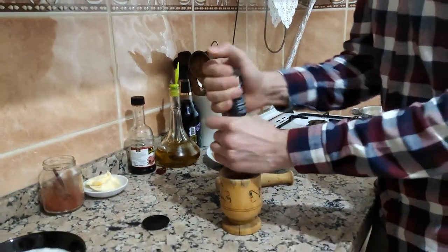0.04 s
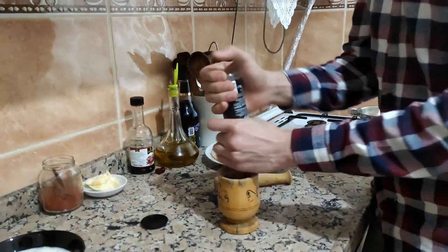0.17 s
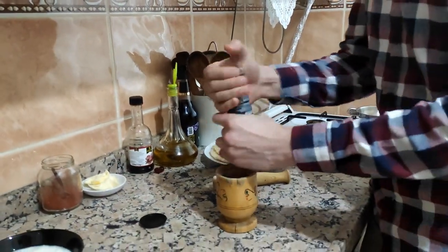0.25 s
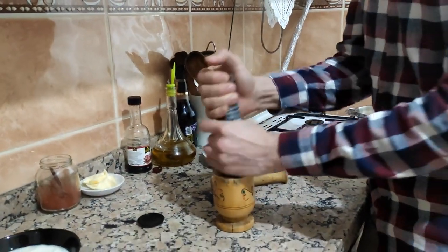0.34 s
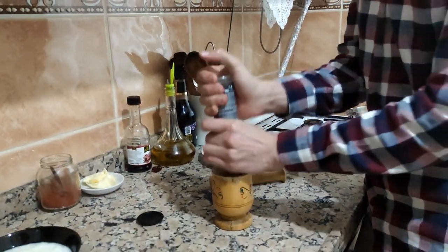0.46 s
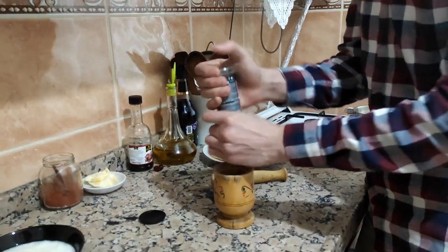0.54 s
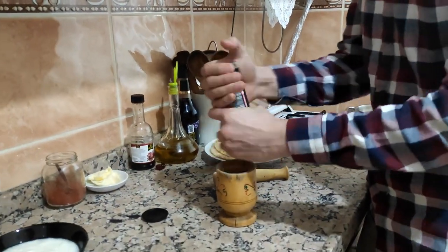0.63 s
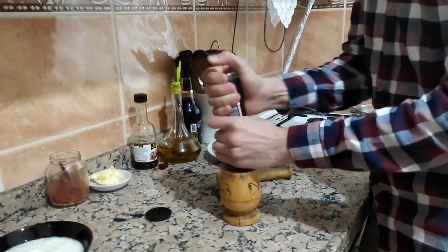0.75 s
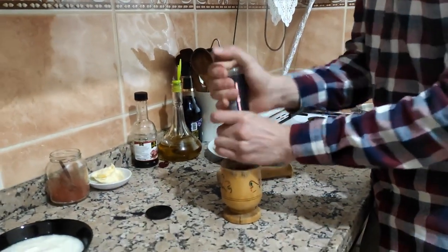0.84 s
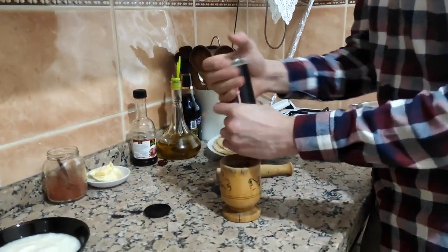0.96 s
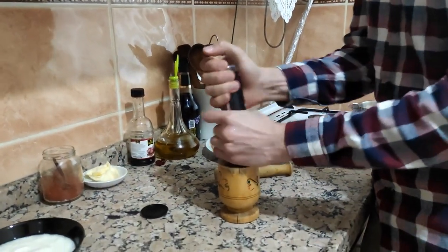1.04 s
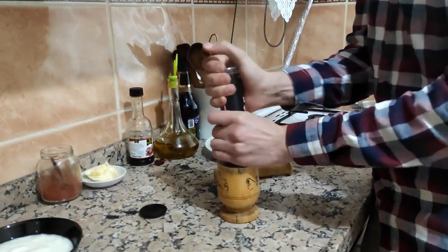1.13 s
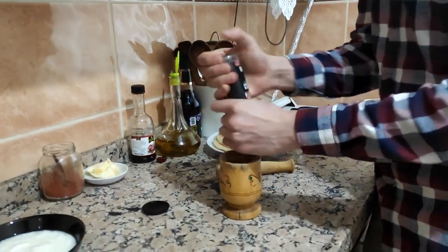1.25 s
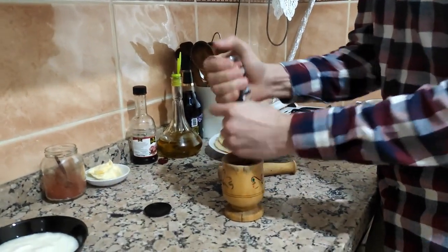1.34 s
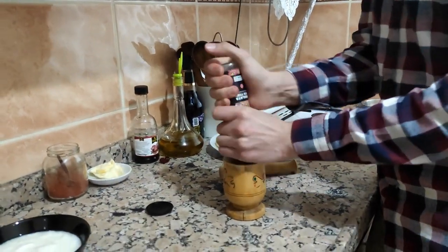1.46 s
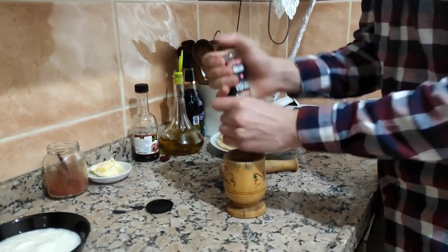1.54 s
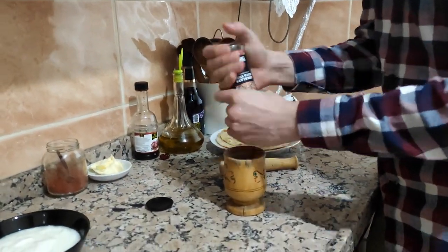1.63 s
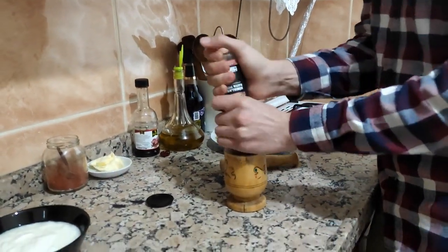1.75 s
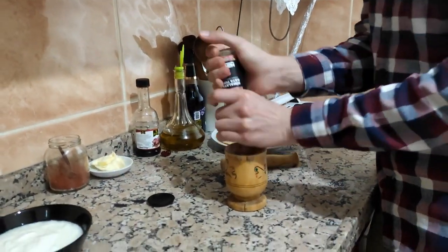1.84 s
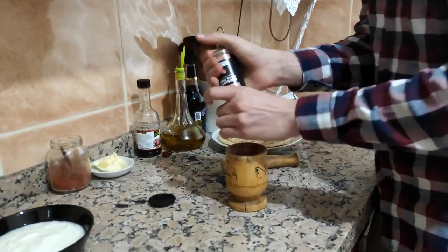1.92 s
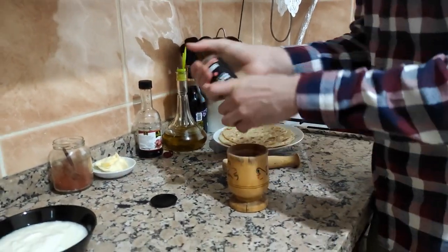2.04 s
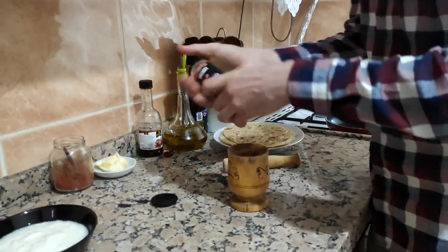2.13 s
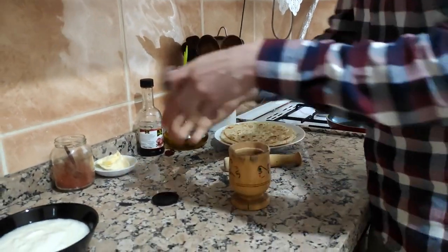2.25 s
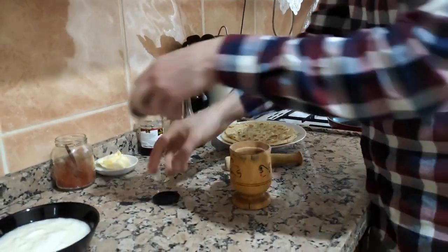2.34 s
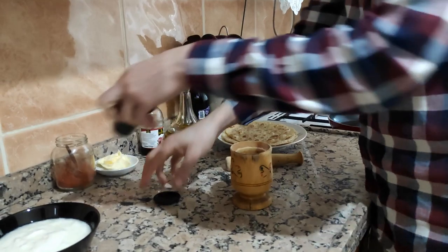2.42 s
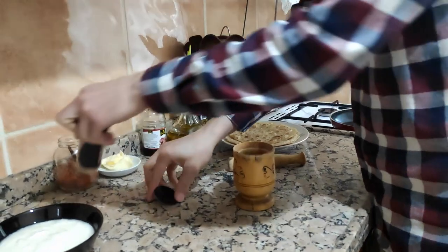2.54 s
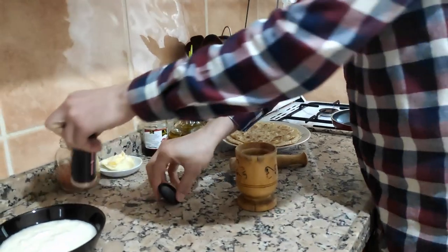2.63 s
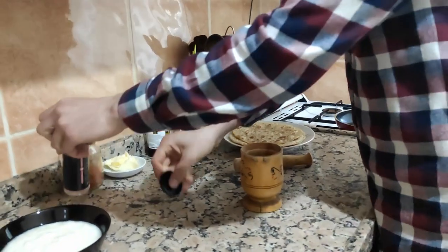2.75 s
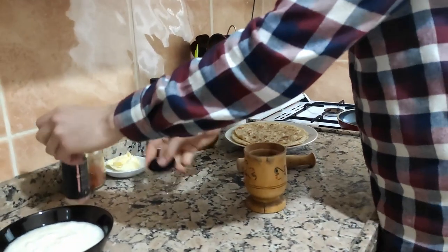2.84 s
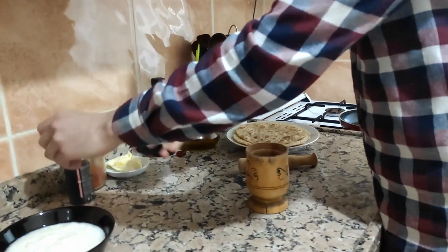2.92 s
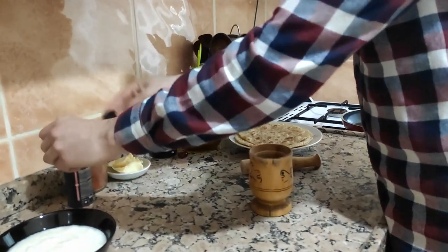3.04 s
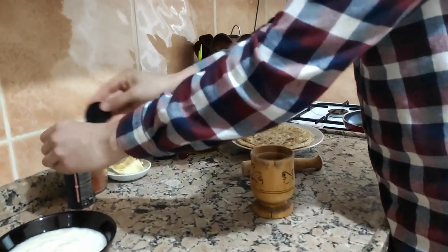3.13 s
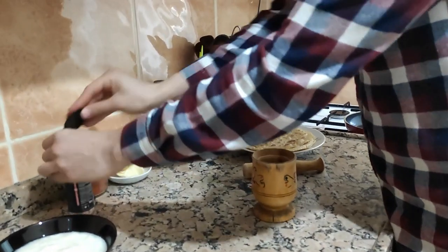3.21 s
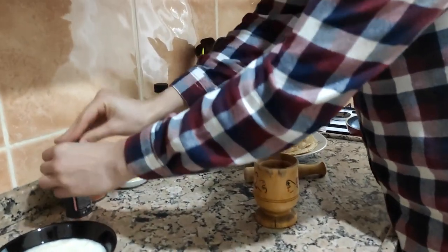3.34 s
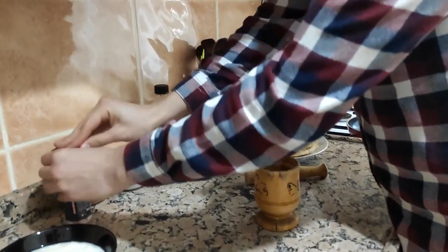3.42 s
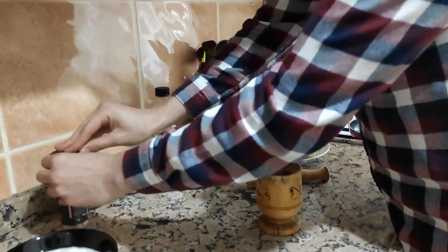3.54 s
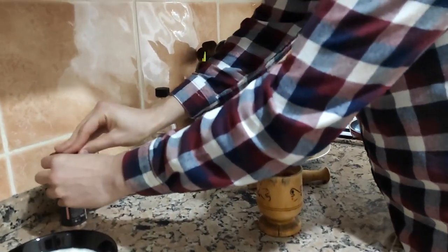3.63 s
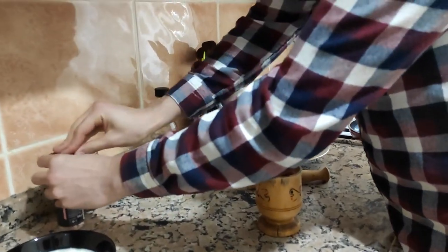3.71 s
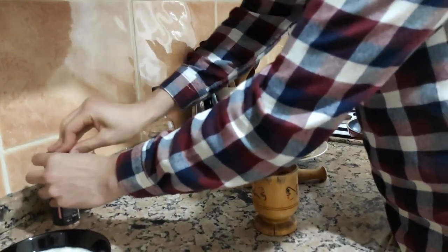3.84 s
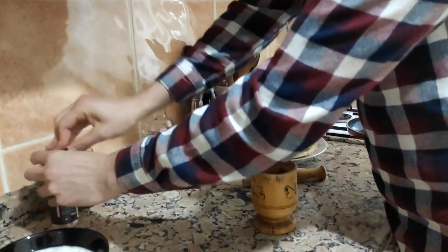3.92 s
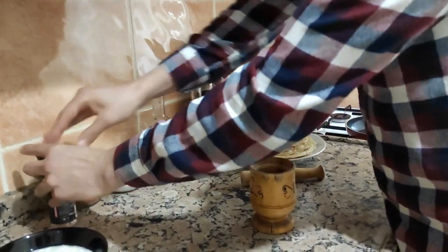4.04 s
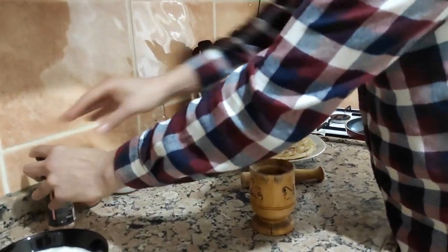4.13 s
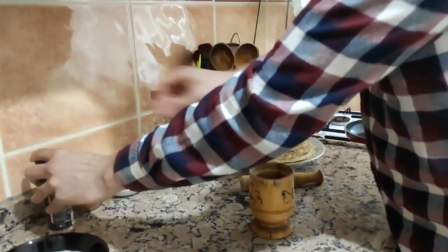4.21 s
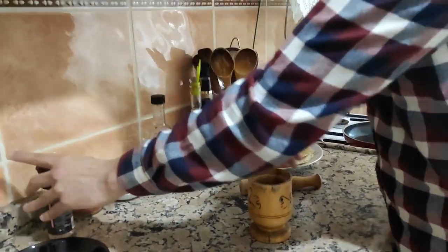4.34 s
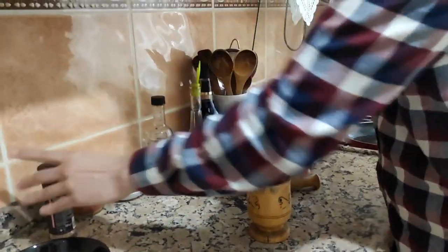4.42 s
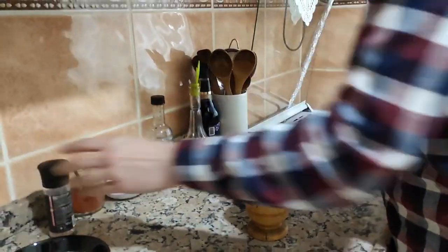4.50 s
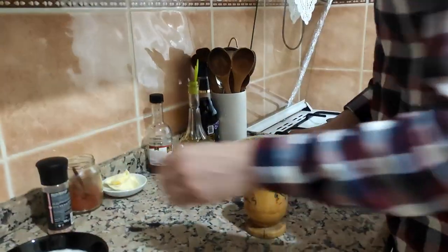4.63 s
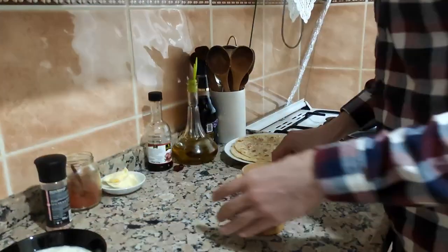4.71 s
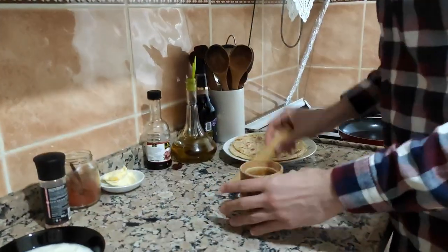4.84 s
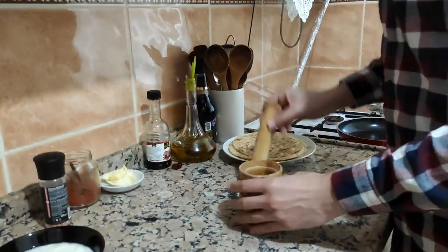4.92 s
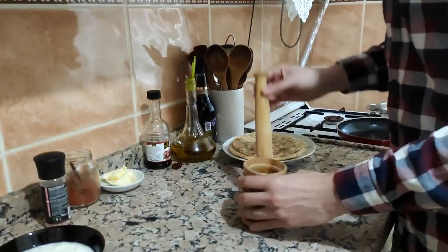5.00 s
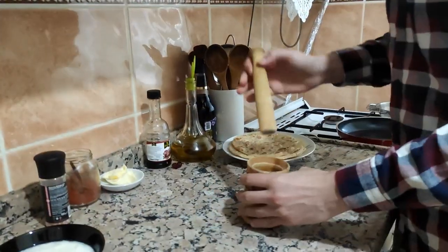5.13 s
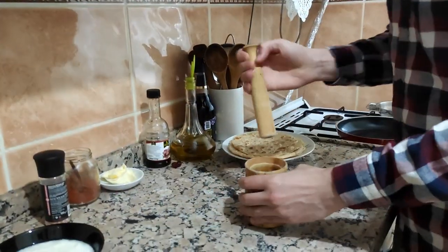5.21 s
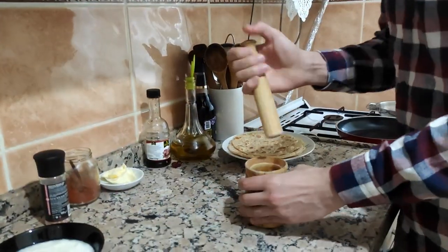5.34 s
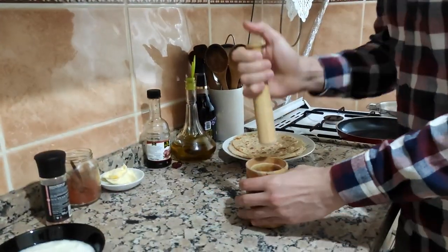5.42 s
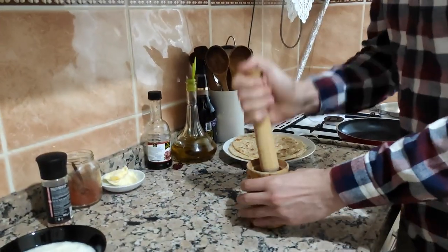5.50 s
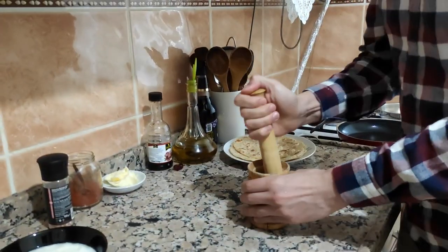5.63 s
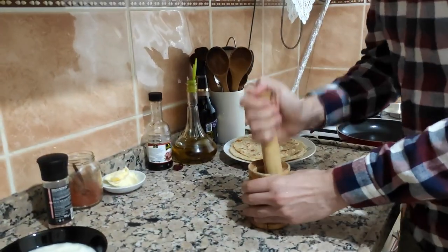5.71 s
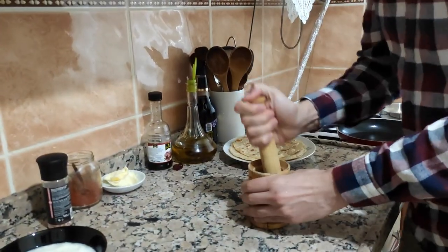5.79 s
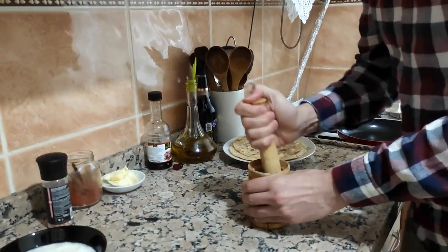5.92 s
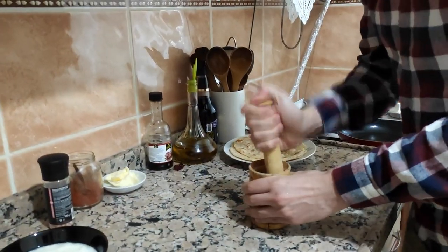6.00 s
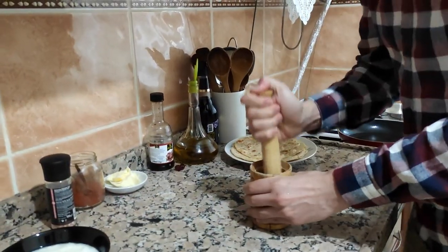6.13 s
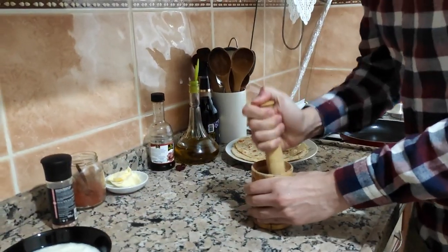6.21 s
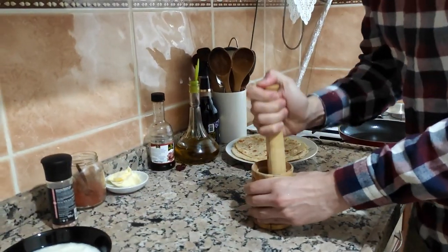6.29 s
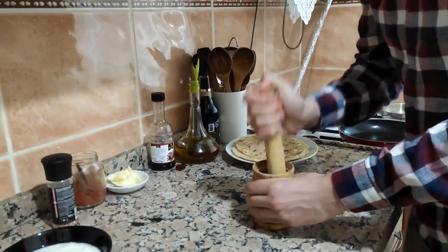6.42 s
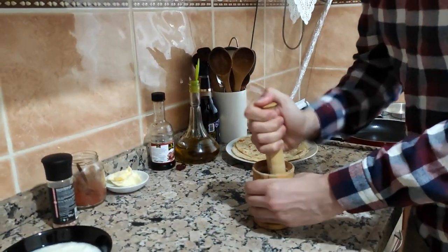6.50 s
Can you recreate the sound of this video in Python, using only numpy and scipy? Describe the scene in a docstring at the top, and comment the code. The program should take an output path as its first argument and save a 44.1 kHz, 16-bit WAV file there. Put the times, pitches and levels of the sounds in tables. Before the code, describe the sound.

A faint, low fridge hum runs throughout in a tiled kitchen with a short echo. From the start to about 2 seconds, a hand mill grinds salt in six short twists, roughly three a second, each a dry crunch with sharp snaps and a soft hiss of loose grains. A thin, high ping comes at 2 seconds, and salt slides softly until nearly 3. Just after 3 seconds the mill knocks down on a stone counter, followed by light clicks and taps of its cap until about 4.2. At around 5.3 seconds a wooden mortar knocks on the stone. Light wooden taps come near 5.7, then from 6 to about 6.5 seconds a wooden pestle pounds garlic in a fast run of louder blows, each ringing the bowl briefly, the heavier ones with a dull thud from the counter.

```python
"""A fridge hums in a tiled kitchen. Six twists of a hand mill grind salt into a wooden mortar: loose grains
hiss as the hand regrips, then crystals crunch and snap between the burrs. The mill is lifted away with a
thin ping and a slide of salt, knocks down on the stone counter at 3 s and is capped. From 5 s the mortar
is shifted and knocks on the stone; last, the pestle pounds garlic in a fast run of blows that ring the
bowl and make the counter thud."""
import sys
import numpy as np
from scipy import signal
from scipy.fft import rfft, irfft
from scipy.io import wavfile
from scipy.ndimage import uniform_filter1d

SR = 44100
rng = np.random.default_rng(int(sys.argv[2]) if len(sys.argv) > 2 else 0)


def store_pcm(level_fs):
    """Save levels as 16-bit WAV."""
    pcm = np.round(np.clip(level_fs, -1, 1) * 32767).astype(np.int16)
    wavfile.write(sys.argv[1], SR, np.atleast_2d(pcm).T)


N = 289296
SIZE = 24576  # samples in one hit and its tail
T, HZ = np.arange(SIZE) / SR, np.fft.rfftfreq(SIZE, 1 / SR)

# Decay of the tiled room: frequency_hz, t60_s
ROOM_DECAY = [(120, 0.18), (400, 0.6), (1000, 0.33), (2700, 0.29), (7000, 0.27), (14000, 0.22)]
# How alike left and right are in the room: frequency_hz, correlation
STEREO_LIKENESS = [(30, 0.35), (100, 0.18), (250, 0.81), (600, 0.46), (1300, 0.033), (14000, .1)]
# Tone of the still air: frequency_hz, gain_db
AIR_EQ = [(10, -4), (28, -16), (50, -20), (80, -13), (160, -13.5), (190, -20.5), (298, -17), (430, -24),
          (900, -31.5), (2500, -38.5), (6000, -40.5), (7800, -38), (9000, -51.5), (14500, -47.5)]
# Partials of the fridge hum: pitch_hz, relative_level_db
FRIDGE_PARTIALS = [(100, -53), (149.7, -57.5), (205, -71), (250, -70), (300, -72.5)]
# Salt sliding as the mill is carried off and the mortar is jolted: middle_s, length_s, level_db
SALT_SLIDES = [(2.235, 0.2, -52), (2.525, 0.32, -52), (2.686, 0.23, -44), (2.905, 0.062, -58),
               (5.841, 0.1, -50)]
# Tone of sliding salt: frequency_hz, gain_db
SLIDE_EQ = [(500, -31), (2000, -10), (4800, -11), (6400, 5.5), (7800, -1), (9000, -14.5), (11000, -19),
            (13500, -9.5)]
# Twists of the mill: start_s, end_s, level_db, swell_db, regrip_hiss_db
MILL_TWISTS = [(0.114, 0.179, -41, 3, -55), (0.467, 0.534, -39, 7, -60), (0.808, 0.876, -41.5, 20, -51.5),
               (1.143, 1.228, -44, -11, -48.5), (1.471, 1.535, -42.5, 6, -50), (1.778, 1.9, -43.5, -8, -52)]
# What the grinding rings in the mill and the hollow below it: pitch_hz, level_db, t60_s
GRIND_MODES = [(974, -13, 0.1), (1610, -8, 0.068), (2790, -10, .08), (3410, 20, 0.019)]
# Tone of salt being crushed: frequency_hz, gain_db
GRIND_EQ = [(300, -23), (600, -9.5), (820, -10.5), (1000, 8), (1250, -6.5), (1650, 0), (2300, 2),
            (3300, -1.5), (4800, -2), (7700, -1.5), (9000, -20.5), (11000, -16.5), (13400, -24),
            (14500, -11)]
# Large crystals snapping and small ticks of the mill: start_s, level_db, pitch_hz
SNAP_HITS = [(.491, -1.5, 3020), (0.552, -1, 2870), (.87, -5, 3730), (1.189, -4.5, 3320),
             (1.444, -13.5, 2240), (1.534, 2.5, 3500), (1.902, -4.5, 2780), (2.164, -18.5, 1810),
             (3.928, -15, 6600)]
# Knocks of the mill and its cap: start_s, level_db, treble_db, bass_db, pitch_hz
MILL_KNOCKS = [(3.0531, -8, -2, -4.5, 2380), (3.149, -23.5, -9, -3, 1210), (3.380, -36.5, 13, -14, 3050),
               (3.393, -27, -2.5, -16, 3080), (3.485, -30.5, 19, 5, 3250), (3.584, -21, -5, -5, 1560),
               (3.712, -33.5, 14, 11.5, 1130), (3.72, -26.5, -5, 7, 1860), (4.221, -26, -7, -6.5, 770)]
# Tone of a knock's crack on the mill: frequency_hz, gain_db
MILL_EQ = [(50, -24.5), (100, 4), (200, -2), (400, -2), (550, -3.5), (850, -1), (1200, -4), (1600, -3),
           (2400, -6), (4000, -14), (5500, -20), (7800, -21.5), (9000, -39.5), (14000, -38.5)]
# Modes of the mill standing on the stone, and of its cap: pitch_hz, level_db, t60_s
MILL_MODES = [(404, -4, 0.29), (762, -1, 0.094), (1070, -5, 0.29), (1140, 1, 0.12), (1606, -5, 0.16),
              (2270, -3.5, 0.16), (2390, -7.5, .2), (3030, -6, .1), (3420, -12, .13), (4164, -13.5, .1)]
# Knocks and pestle blows on the mortar: start_s, level_db, rim_ring_db, counter_thud_db, spot_pitch_hz
MORTAR_BLOWS = [(5.042, -52.5, -5, -49.5, 860), (5.296, -45, -6, -60, 850), (5.3196, -18.5, -4.5, -40, 804),
                (5.7085, -30, 12.5, -66, 1480), (5.835, -47.5, 12.5, -23, 910), (5.973, -18, 5, -23, 1130),
                (6.098, -25, 7, -43, 1550), (6.1205, -16, 1.5, -15.5, 1940),
                (6.286, -15, -0.5, -15.5, 2400), (6.335, -23, 14, -40, 1030),
                (6.4435, -24, -5, -15.5, 1090)]
# Tone of a crack on wood: frequency_hz, gain_db
WOOD_EQ = [(60, -17), (150, -1.5), (400, -1.5), (620, -0.5), (850, 0.5), (1250, 0.5), (2000, -4),
           (3000, -12.5), (3650, -11), (6000, -15.5), (7800, -14.5), (9000, -31), (14000, -36)]
# Modes of the wooden mortar: pitch_hz, level_db, t60_s
MORTAR_MODES = [(492, -3.5, 0.15), (753, -1.5, 0.2), (817, -3.5, 0.14), (1033, -6.5, 0.3),
                (1103, -4.5, 0.35), (1143, -2, 0.096), (1297, -9.5, 0.2), (1652, -4.5, 0.11),
                (2266, -18, 0.31), (2400, -20, 0.26), (2687, -12.5, 0.13), (3510, -7, 0.082),
                (3600, -18.5, 0.15), (4000, -10, 0.048)]
# Modes of the counter under the mortar: pitch_hz, level_db, t60_s
COUNTER_MODES = [(85.5, -11.5, 0.06), (156, -14, 0.073), (206, -1.5, 0.12), (270.2, -16.5, 0.35),
                 (293.5, -15, 0.28), (368.7, -23, 0.28), (442.5, -18, 0.2)]

CRACK_DB = 29.5  # drive of the contact noise into wood and mill


def amp(db):
    """Decibels to gain."""
    return 10 ** (np.asarray(db) / 20)


def pan(left_db):
    """Turns the left side up and the right side down by the same amount."""
    return amp([[left_db], [-left_db]])


def unit(x):
    """Scales to rms 1."""
    return x / np.sqrt(np.mean(x ** 2) + 1e-20)


def curve(points, hz):
    """Reads a table along a log-frequency axis."""
    f, value = np.transpose(points)
    return np.interp(np.log(hz + 1), np.log(f + 1), value)


def shelf(corner_hz):
    """High-shelf shape: a smooth step from 0 to 1 across the corner."""
    return HZ ** 3 / (HZ ** 3 + corner_hz ** 3)


def bell(hz, db):
    """A resonant EQ hump in dB around one pitch."""
    return db / (1 + (3.73 * np.log((HZ + 1) / hz)) ** 2)


def eq(x, gain_db):
    """Minimum-phase EQ, so attacks stay sharp; the gain is given on HZ."""
    cepstrum = irfft(np.log(amp(gain_db)))
    cepstrum[1:SIZE // 2] *= 2
    cepstrum[SIZE // 2 + 1:] = 0
    impulse = irfft(np.exp(rfft(cepstrum)))[None, :SIZE // 8]
    return signal.fftconvolve(x, impulse, axes=1)[:, :x.shape[1]]


def add(mix, start_s, sound):
    """Lays a stereo sound into the mix."""
    part = mix[:, max(round(start_s * SR), 0):][:, :sound.shape[1]]
    part += sound[:, :part.shape[1]]


def diffuse(size):
    """Stereo white noise, partly alike in the lows and wide in the highs."""
    left, other = rfft(rng.standard_normal((2, size)))
    likeness = np.clip(curve(STEREO_LIKENESS, np.fft.rfftfreq(size, 1 / SR)), -1, 1)
    right = likeness * left + np.sqrt(1 - likeness ** 2) * other
    return irfft(np.array([left, right]), size)


def room_tail():
    """Kitchen reverb of energy 1; each band dies at its own speed."""
    hz, t, bands = signal.stft(diffuse(SIZE), SR, nperseg=256)
    decay = amp(-60 * t / curve(ROOM_DECAY, hz)[:, None])
    tail = signal.istft(bands * decay, SR, nperseg=256)[1][:, :SIZE]
    return unit(tail * (1 - np.exp(-T / 0.0087))) / np.sqrt(SIZE)


def contact(clatter_s, room_db, direct_db):
    """A sharp crack, a clatter of echoes off counter and tiles, then the room; evened out to white."""
    crack = unit(rng.standard_normal(SIZE) * np.exp(-T / 0.0018))
    direct = np.array([np.pad(crack, (10, 0))[:SIZE], crack])  # reaches the right side first
    echoes = unit(diffuse(SIZE) * np.exp(-T / max(2 * clatter_s, .002)) * (1 - np.exp(-T / 0.0022)))
    burst = (amp(direct_db) * direct + echoes) / np.sqrt(SIZE) + amp(room_db) * room_tail()
    power = uniform_filter1d((abs(rfft(burst)) ** 2).mean(0), size=201)
    return eq(burst, -10 * np.log10(power / power.mean()))


def ring(modes, rise_s, vary_db):
    """Dying modes whose strength changes with the spot that is hit."""
    out = np.zeros((2, SIZE))
    for hz, db, t60_s in modes:
        # short waves reach left and right out of step
        phase = rng.uniform(0, 2 * np.pi) + hz / 900 * rng.standard_normal((2, 1))
        envelope = amp(db + vary_db * rng.standard_normal() - 60 * T / t60_s)
        out += envelope * np.sin(2 * np.pi * hz * T + phase)
    return out * (1 - np.exp(-T / rise_s))


def room_air():
    """A faint bed of still air, its level set by the part above the rumble."""
    air = eq(diffuse(N), curve(AIR_EQ, HZ))
    above_rumble = signal.sosfilt(signal.butter(4, 350, "high", fs=SR, output="sos"), air)
    return amp(-63.5) * air / above_rumble.std() * pan(.7)


def fridge():
    """A low hum a little to the left; each partial wavers in level and phase."""
    t, knots = np.arange(N) / SR, np.linspace(0, N / SR, 30)
    hum = np.zeros(N)
    for hz, db in FRIDGE_PARTIALS:
        sway, drift = (np.interp(t, knots, v) for v in rng.standard_normal((2, len(knots))))
        hum += amp(db + 1.4 * sway) * np.sqrt(2) * np.sin(2 * np.pi * hz * t + .2 * drift)
    return amp(-3.0) * hum * pan(.7)


def sliding_salt():
    """Tiny grains run over each other in soft, ragged swells of hiss whenever the salt is moved."""
    lead_s, regrip_s = 0.057, .16  # the hand swings back before each twist and shakes the salt
    regrips = [(start_s - lead_s, regrip_s, db) for start_s, *_, db in MILL_TWISTS]
    hiss = np.zeros((2, N))
    for middle_s, length_s, db in regrips + SALT_SLIDES:
        size = max(round(length_s * SR), 64)
        add(hiss, middle_s - length_s / 2, amp(db) * np.hanning(size) * rng.standard_normal((2, size)))
    clumps = amp(2.2 * unit(uniform_filter1d(rng.standard_normal(N), size=500)))
    return eq(hiss * clumps, curve(SLIDE_EQ, HZ)) * pan(1)


def mill_grind():
    """Each twist crushes a dense shower of crystals, large and small, between the burrs."""
    grains_per_s, spread_db = 1400, 4
    out = np.zeros((2, N))
    for start_s, end_s, db, swell_db, _ in MILL_TWISTS:
        ramp = np.linspace(-.5, .5, max(round((end_s - start_s) * SR), 2))
        breaks = rng.random(SIZE) < grains_per_s / SR
        strength = amp(spread_db * np.minimum(rng.exponential(1, SIZE), 4.2))
        grains = (breaks * strength * rng.choice([-1, 1], SIZE))[:len(ramp)]
        shower = unit(grains) * amp(db + swell_db * ramp) * signal.windows.tukey(len(ramp), .15)
        crack = contact(0.0032, room_db=0.95, direct_db=0.5)
        body = amp(-39.5) * ring(GRIND_MODES, rise_s=0.00044, vary_db=0.92)
        add(out, start_s, signal.fftconvolve(shower[None], crack + body, axes=1))
    return eq(out, curve(GRIND_EQ, HZ)) * pan(.7)


def tick(db, hz, q):
    """A short click centred on one pitch; a high q draws it out into a ping."""
    resonance_db = -10 * np.log10(1 + (q * ((HZ + 1) / hz - hz / (HZ + 1))) ** 2)
    return eq(contact(0.00096, room_db=-5.5, direct_db=0.25), db + resonance_db - 12 * shelf(4450))


def snaps():
    """Large crystals snap and the mill ticks, standing out of the grinding and handling."""
    out = np.zeros((2, N))
    for start_s, db, hz in SNAP_HITS:
        add(out, start_s, tick(db, hz, q=1.8))
    add(out, 2.026, tick(db=4.5, hz=7260, q=44))  # one thin ping as the mill is lifted away
    return out


def mill_knocks():
    """The mill meets the stone and its cap is pressed home; harder contacts are brighter and shorter."""
    out = np.zeros((2, N))
    for start_s, db, treble_db, bass_db, hz in MILL_KNOCKS:
        clatter_s = 0.0058 * 2 ** (-treble_db / 17.5)
        tone_db = treble_db * shelf(2800) + bass_db * (1 - shelf(490)) + bell(hz, db=7)
        crack = eq(contact(clatter_s, room_db=-4.5, direct_db=-6.5), curve(MILL_EQ, HZ) + CRACK_DB)
        body = amp(-15.5) * ring(MILL_MODES, rise_s=0.0013, vary_db=2)
        add(out, start_s, amp(db) * eq(crack + body, tone_db))
    return out


def counter_thud(db):
    """The heavy counter takes a moment to swing: low modes over a dull, pitchless push."""
    push = eq(contact(0.016, room_db=-0.5, direct_db=-1.2), 7 + 20 * shelf(40) - 50 * shelf(760))
    return amp(db) * (ring(COUNTER_MODES, rise_s=0.0052, vary_db=1.0) + push) * pan(-1.2)


def mortar_and_pestle():
    """Wood cracks and rings the bowl; a blow that lands on the bottom also drives the counter."""
    rim_hz, full_blow_db = 3770, -18
    wall_echo_s, wall_echo_db = .0195, -2
    out = np.zeros((2, N))
    for start_s, db, rim_db, thud_db, spot_hz in MORTAR_BLOWS:
        # a blow that glances off the rim is shorter and crushes less salt
        clatter_s = 0.0042 * 2 ** (-rim_db / 17)
        crunch_db = -0.74 * rim_db
        # a full blow rings the whole bowl; the lighter the touch, the more one pitch stands out
        spot_db = 3 + 0.35 * (full_blow_db - db)
        tone_db = crunch_db * shelf(5900) + bell(rim_hz, rim_db) + bell(spot_hz, spot_db)
        crack = eq(contact(clatter_s, room_db=-4, direct_db=-6.0), curve(WOOD_EQ, HZ) + CRACK_DB)
        bowl = amp(-11.5) * ring(MORTAR_MODES, rise_s=0.00016, vary_db=1.9)
        add(out, start_s, amp(db) * eq(crack + bowl, tone_db) * pan(-.4))
        thud = counter_thud(thud_db)
        add(out, start_s, thud)
        add(out, start_s + wall_echo_s, amp(wall_echo_db) * thud)  # the far wall throws it back
    return out


def scene():
    """Mill, salt and mortar over the bed of air and fridge."""
    action = mill_grind() + snaps() + sliding_salt() + mill_knocks() + mortar_and_pestle()
    return action + room_air() + fridge()


def record(dry):
    """A steep high cut takes off the very top."""
    high_cut = signal.firwin(511, 14350, window=("kaiser", 9), fs=SR)
    return signal.oaconvolve(dry, high_cut[None], "same")


dry = scene()
out = record(dry)
store_pcm(out)
```